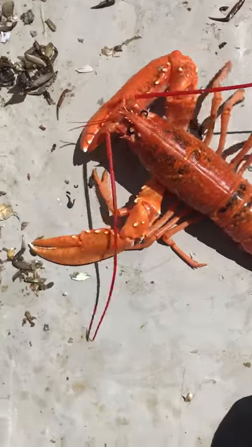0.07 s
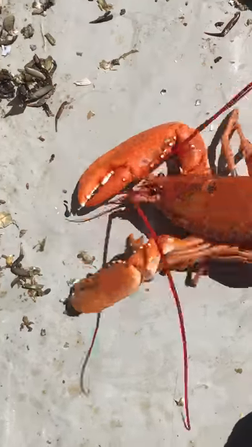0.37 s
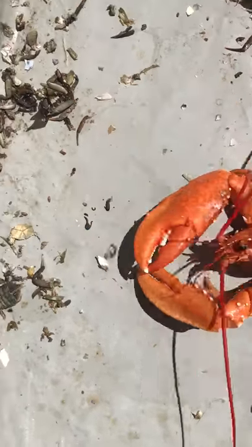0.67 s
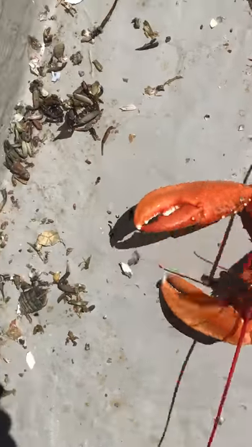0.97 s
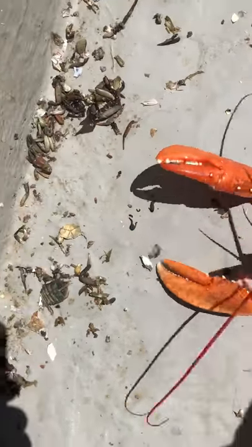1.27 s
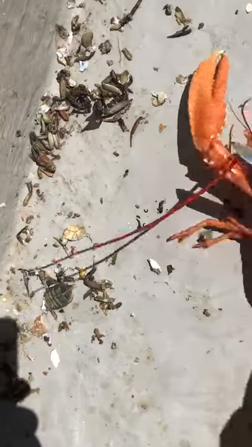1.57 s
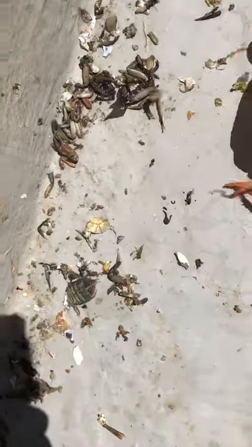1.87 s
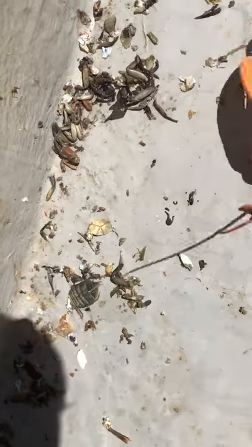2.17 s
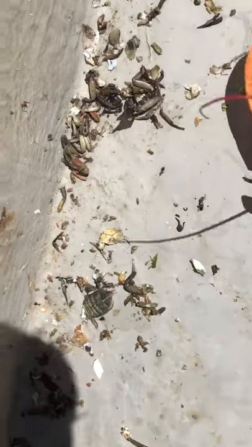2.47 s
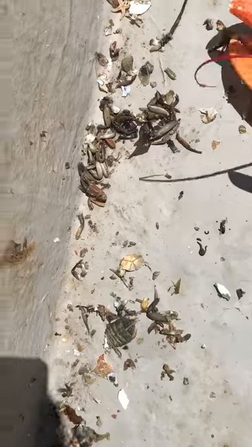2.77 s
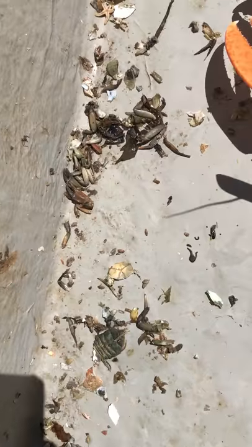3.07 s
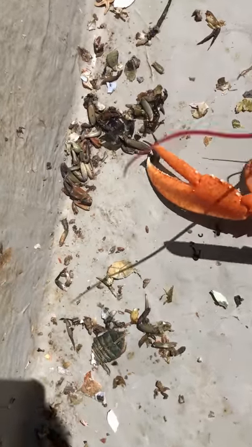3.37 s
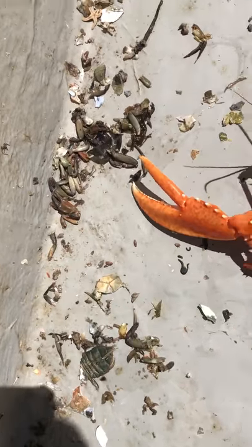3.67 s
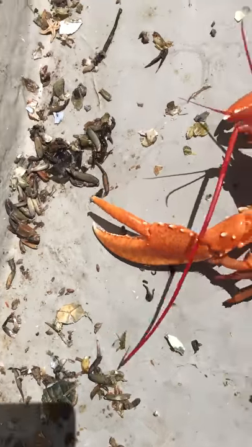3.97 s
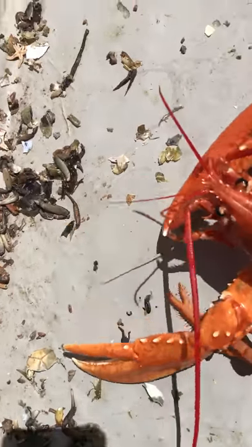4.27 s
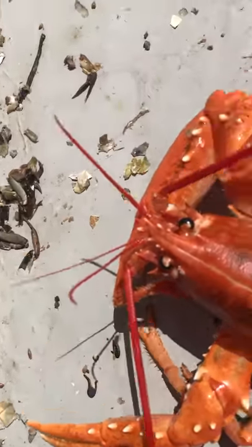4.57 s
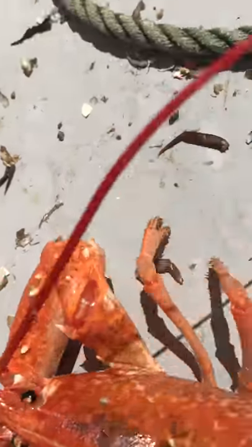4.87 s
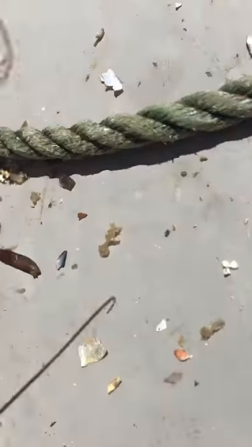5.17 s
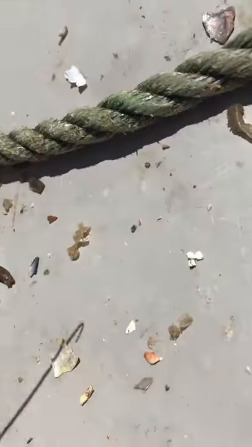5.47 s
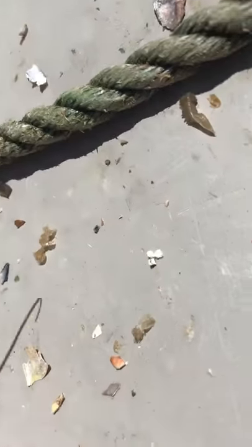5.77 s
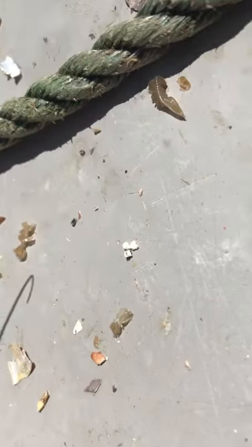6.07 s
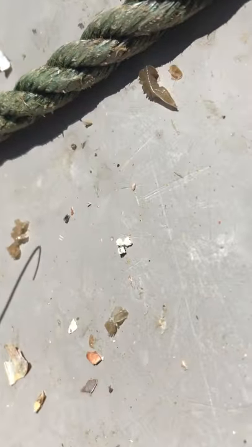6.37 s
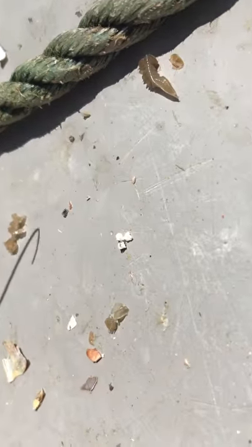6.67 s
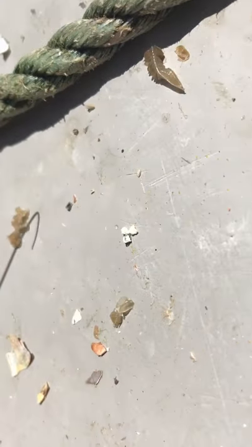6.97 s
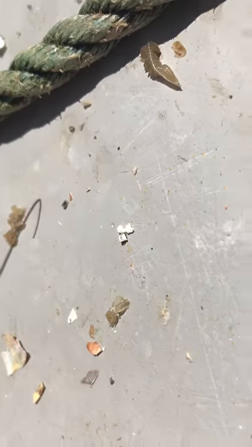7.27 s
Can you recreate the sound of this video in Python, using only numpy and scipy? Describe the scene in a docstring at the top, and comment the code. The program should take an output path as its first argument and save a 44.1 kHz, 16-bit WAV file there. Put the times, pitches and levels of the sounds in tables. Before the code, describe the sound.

Sharp shell slaps and thumps from a lobster on a deck give way to gritty crawling and dry snaps, over gulping water.

```python
"""A lobster flips its tail on a gritty boat deck, close to the microphone: the wet tail fan swishes, the
shell slaps, a hollow claw knocks and the body's weight thumps the deck's modes. It then crawls, grinding
its shell over sand with dull scuffs and small ticks of its legs. A thin squeak falls in three steps and
dry snaps follow. Water slops against the hull, gulping on trapped air, over a low outdoor rumble."""
import sys
import numpy as np
from scipy import signal
from scipy.fft import rfft, irfft, next_fast_len
from scipy.io import wavfile
from scipy.ndimage import uniform_filter1d, map_coordinates

SR = 44100
rng = np.random.default_rng(int(sys.argv[2]) if len(sys.argv) > 2 else 0)


def generate_wav(sig):
    """Save sig (samples, or channels by samples) to the path in sys.argv[1] as 16-bit PCM at SR."""
    pcm = np.round(np.clip(np.atleast_2d(sig).T, -1, 1) * 32767).astype(np.int16)
    wavfile.write(sys.argv[1], SR, pcm)


N = 322812

# swell of the hull's hollow murmur: (time [s], level [dB])
MURMUR_LEVELS = [(0.0, -53.5), (1.49, -35.5), (2.08, -47.5), (2.91, -37), (3.28, -43.5), (5.42, -46),
                 (5.71, -52.5), (6.24, -46.5), (7.32, -50)]
# tone of the hull murmur, the outdoor rumble and the ripples: (frequency [Hz], gain [dB])
MURMUR_EQ = [(60, -21), (110, -14.5), (165, 11), (205, 0), (245, 2), (330, -10), (500, -17.5), (1200, -69)]
RUMBLE_EQ = [(33, -50), (42, 0.5), (56, -0.5), (68, 2), (84, -5), (105, -0.5), (150, -13.5), (400, -65)]
LAPPING_EQ = [(150, -25), (380, 7), (650, -1.5), (1100, -8.5), (2000, -40.5), (6000, -37.5)]
# water slopping at the hull: (time [s], level [dB], start pitch [Hz], end pitch [Hz], t60 [s])
SLOPS = [(0.019, -28, 184, 151, 0.2), (0.804, -21.5, 129, 98, 0.14), (1.013, -26.5, 154, 100.4, 0.65),
         (1.293, -22, 176, 89, 0.3), (1.311, -17, 89, 57.6, 0.11), (1.367, -27, 147, 109, 0.13),
         (1.867, -25.5, 280, 200, 0.11), (2.927, -23.5, 148, 105, 0.47), (3.571, -24.5, 105, 66.5, 0.16),
         (4.328, -27, 227, 173, 0.13), (4.648, -23, 170, 146.4, 0.4), (4.674, -26, 88, 65, 0.11),
         (5.014, -28, 209, 197, 0.32), (5.321, -20, 241, 195, 0.35), (5.328, -24.5, 140, 99.7, 0.47),
         (6.0669, -32.5, 1570, 930, 0.16), (6.122, -14.5, 112, 50.4, 0.27), (6.23, -24.5, 87.5, 60.6, 0.61),
         (6.915, -20.5, 115, 95, 0.17), (7.154, -28, 194.6, 128.5, 0.43), (7.18, -25, 83, 60.5, 0.15)]
# steps of the squeak: (time [s], length [s], pitch [Hz], level [dB])
SQUEAK_STEPS = [(4.395, 0.087, 6290, -52.5), (4.489, 0.11, 5620, -48.5), (4.598, 0.14, 4880, -45)]
# its partials: (frequency [x pitch], level [dB])
SQUEAK_PARTIALS = [(0.69, -18), (1, -.5), (2, -19)]
# thin, dry snaps: (time [s], peak [dB])
SNAPS = [(5.519, -35), (5.584, -31), (5.65, -27.5), (5.771, -26.5), (5.776, -24), (6.091, -33),
         (6.1254, -24.5), (6.162, -27.5), (6.1915, -10.5), (6.195, -13.5), (6.222, -16), (6.266, -24),
         (6.401, -29.5), (6.4356, -11.5), (6.53, -25.5), (6.79, -26), (6.948, -30), (7.2346, -33.5)]
# resonances of every snap: (frequency [Hz], gain [dB])
SNAP_EQ = [(300, -6), (1500, -1), (2500, -11.5), (4100, 5.5), (5500, -10.5), (6760, 6.5), (7700, -28),
           (8700, 0), (10400, -14), (11800, 2.5), (13000, -9.5), (16000, -6)]
# the shell dragging: (time [s], grind level [dB], hiss level [dB])
DRAG_LEVELS = [(0.0, -43, -44), (0.24, -52.5, -66), (0.49, -38.5, -43.5), (0.61, -44, -42),
               (0.83, -45.5, -48), (1.32, -45.5, -45), (1.49, -34, -40), (1.67, -45.5, -45),
               (2.14, -53, -49), (2.42, -41.5, -44), (2.59, -60, -56), (2.75, -41.5, -45),
               (2.89, -47.5, -39.5), (3.12, -44, -40.5), (3.3, -50.5, -50), (3.69, -50, -52),
               (4.03, -45, -49.5), (4.36, -45.5, -51.5), (4.69, -47, -53.5), (5.12, -50.5, -53.5),
               (5.42, -56.5, -61), (6.54, -52, -53), (6.99, -54.5, -57), (7.32, -56.5, -56)]
# tone of its grind and hiss: (frequency [Hz], gain [dB])
GRIND_EQ = [(180, -18.5), (330, 8.5), (480, -6.5), (620, -3), (790, -1), (1000, 0), (1600, -2.5),
            (2400, -11.5), (4000, -19.5), (8000, -57.5)]
HISS_EQ = [(1200, 3.5), (2400, 5.5), (3600, 6.5), (6000, 2.5), (9000, -0.5), (10500, -5.5), (12200, 0),
           (16000, -8)]
# the drag ducks as the animal holds still: (centre time [s], gain [dB])
PAUSES = [(.68, -5.5), (1.01, -9), (1.39, -12), (2.21, -1), (2.66, -4), (4.09, -8), (4.785, -5.5),
          (6.331, -4.5)]
# dull, hollow scuffs: (peak time [s], half-length [s], level [dB], centre frequency [Hz])
SCUFFS = [(.43, 0.054, -30, 219), (1.311, 0.025, -35.5, 297), (2.325, 0.03, -31, 270),
          (4.311, 0.16, -40.5, 550), (4.675, .035, -42, 326), (4.95, 0.031, -42, 430),
          (6.135, 0.039, -39, 600), (6.792, 0.027, -39.5, 282), (7.154, 0.078, -45.5, 560)]
# leg tips tapping: (time [s], peak [dB], ring pitch [Hz])
TICKS = [(0.4646, -24, 2460), (0.495, -26, 2520), (0.697, -24, 12500), (1.749, -27.5, 9350),
         (1.783, -29, 3450), (2.772, -18.5, 3460), (3.574, -30, 2820), (3.752, -27, 5530),
         (4.2915, -22.5, 3440), (4.327, -31, 2480), (4.3852, -39, 2600), (4.9342, -27, 5930),
         (6.6522, -19, 2910), (6.8095, -29, 2600)]
# a tick's ring: (frequency [x ring pitch], level [dB])
TICK_PARTIALS = [(1, -4), (1.46, -10)]
# a tick's click: (frequency [Hz], gain [dB])
CLICK_EQ = [(200, -11), (600, -1.5), (1500, 3), (2300, 2.5), (4200, 2), (6600, 1), (8200, -9.5),
            (14000, -8)]
# the claw knocking: (time [s], peak [dB], tuning [x mode frequency], tilt [dB/octave])
KNOCKS = [(.364, -36, 0.93, -2), (0.418, -21.5, 0.74, -1), (.449, -29, 0.62, -1), (.465, -25.5, 0.73, -10),
          (0.495, -28, 0.8, 5), (.531, -24, 0.92, -12), (.748, -23, 0.95, -20), (0.7913, -20.5, 1.4, -16),
          (1.126, -17, 1.28, 11), (1.412, -33, 0.93, -3), (1.5395, -17, 1, -10), (1.9536, -17, 0.89, 14),
          (2.301, -19.5, 0.76, 10), (2.333, -21.5, 0.97, 0), (2.3578, -20.5, 0.96, 0),
          (3.235, -27, 0.85, 2), (4.075, -32, 1.3, -2), (4.122, -32.5, 1.28, 3), (4.29, -23.5, 0.98, 6),
          (4.328, -24, 1.25, 10), (4.413, -24, 0.87, -10), (6.193, -24.5, 0.63, -5),
          (6.435, -21, 0.617, 8.5), (6.63, -29, 0.5, -5)]
# modes of the claw and of the deck: (frequency [Hz], level [dB], t60 [s])
CLAW_MODES = [(838, -4, 0.043), (957, -1, 0.071), (1232, -2, 0.052), (1650, -11, 0.045), (1900, -3, .035),
              (2400, -10, 0.014)]
DECK_MODES = [(104, -15.5, 0.25), (169.6, -2.5, 0.15), (226.6, -0.5, 0.078), (242, 8.5, 0.027),
              (297, -5, 0.12), (366, -8.5, 0.063), (777, 0.5, 0.043), (1116, -8.5, 0.075)]
# the body landing: (time [s], peak [dB], contact time [s])
THUMPS = [(0.363, -19.5, 0.00049), (0.403, -17, 0.0023), (.414, -14, 0.00034), (.448, -18, 0.00035),
          (0.47, -22, 0.00046), (0.558, -13, 0.017), (0.564, -16, 0.006), (0.723, -21.5, 0.00026),
          (0.79, -17, 0.0091), (1.083, -22, .002), (1.128, -14.5, 0.014), (1.305, -27, 0.0036),
          (1.33, -23, .012), (1.484, -17.5, 0.002), (1.539, -11.5, 0.00069), (1.623, -23, 0.0023),
          (1.915, -2.5, 0.0025), (2.298, -20.5, 0.00072), (2.3236, -8.5, 0.0051), (2.702, -18, 0.00065),
          (2.751, -18.5, 0.0022), (2.812, -20.5, 0.013), (2.926, -17, 0.027), (3.546, -24, 0.003),
          (5.121, -23, 0.0011), (6.486, -23, 0.00037)]
# tail and claws sweeping over grit: (peak time [s], length [s], mid level [dB], brightness [dB/band])
SWISHES = [(.055, 0.05, -56, -5), (0.295, 0.25, -51, -2.5), (0.379, 0.076, -42, -5.5),
           (0.425, 0.051, -32.5, 4.5), (0.602, 0.1, -43, 3), (0.776, 0.049, -37.5, 7),
           (0.947, 0.047, -41.5, 1.5), (1.106, 0.074, -36, -1), (1.467, 0.026, -34, 2.5),
           (1.494, 0.061, -33.5, 5), (2.113, 0.066, -54, 6.5), (2.291, 0.035, -34, -0.5),
           (2.539, 0.13, -45, -1), (2.752, 0.09, -43, -0.5), (2.862, 0.029, -27, 9),
           (3.314, 0.046, -42.5, -3), (3.476, 0.083, -53, 0.5), (3.962, 0.039, -51, -4.5),
           (4.298, 0.098, -50, -12), (4.846, 0.05, -48.5, -8.5), (4.899, 0.07, -48, -8),
           (6.072, 0.018, -58, -22), (6.452, 0.071, -58, -18)]
# shell hitting the deck: (time [s], level [dB], brightness [dB/band], ring pitch [Hz], mid t60 [s])
SLAPS = [(0.424, -22, 1.5, 12750, 0.0059), (.448, -24.5, 4.5, 9500, 0.0051), (.531, -34, 5.5, 850, 0.016),
         (0.5645, -27.5, -1, 884, 0.02), (0.5705, -26, -1, 1630, 0.023), (0.7463, -24, -2.5, 3430, 0.028),
         (0.784, -31, -1, 2830, 0.02), (0.7881, -22, 6, 5700, 0.03), (0.7927, -21.5, 0.5, 1300, 0.03),
         (1.0821, -25, 0, 3520, 0.028), (1.1261, -16, 4.5, 4200, 0.029), (1.452, -24.5, -3.5, 1900, 0.074),
         (1.538, -36, -12.5, 1440, 0.019), (1.569, -26.5, 20, 9400, 0.0088), (1.574, -37, 5, 9350, 0.076),
         (1.9074, -23, 9, 6040, 0.041), (1.913, -29, -3.5, 8300, 0.07), (1.953, -25, -3, 1890, 0.011),
         (2.312, -24, -2.5, 11700, 0.053), (2.3155, -19.5, 3, 3370, 0.021), (2.357, -27.5, -6, 1870, 0.015),
         (2.6981, -38.5, -7.5, 1510, 0.04), (2.739, -18.5, 1, 4830, 0.02), (2.7489, -21, 0, 5130, 0.036),
         (2.758, -30, 7, 5200, 0.018), (2.839, -31.5, 4, 7500, 0.12), (2.904, -33, 6, 6560, 0.069),
         (2.926, -16.5, 1, 1890, 0.011), (3.2801, -32, -4.5, 920, 0.035), (3.5447, -39.5, -6.5, 980, 0.063),
         (4.2895, -39, -12, 3600, 0.03), (4.387, -47.5, -19.5, 587, 0.023),
         (5.321, -42.5, -2.5, 1150, 0.072), (6.91, -43, -7.5, 560, 0.047)]
# edges of the shell's low, mid and high bands: (frequency [Hz])
BAND_EDGES = [400, 2800, 7500, 20000]
BAND_TILT = np.array([-1, 0, 1])  # brightness trades lows for highs


def amp(db):
    """Decibels to gain."""
    return 10 ** (np.asarray(db) / 20)


def unit(x):
    """Scale to rms 1."""
    return x / np.sqrt(np.mean(x ** 2) + 1e-20)


def at_peak(x, db):
    """Scale to a peak level."""
    return amp(db) * x / np.abs(x).max()


def curves(rows):
    """One automation curve for each column after the time."""
    times, *columns = np.transpose(rows)
    return [np.interp(np.arange(N) / SR, times, column) for column in columns]


def wobble(rate):
    """A smooth random curve, rate knots a second."""
    return map_coordinates(rng.standard_normal(int(N * rate / SR) + 4), [np.arange(N) * rate / SR])


def filtered(x, response):
    """Filter x by a gain given as a function of frequency."""
    padded = next_fast_len(len(x) + 8192)
    return irfft(rfft(x, padded) * response(np.fft.rfftfreq(padded, 1 / SR)), padded)[:len(x)]


def coloured(x, eq):
    """x through an EQ curve, at rms 1."""
    points_hz, db = np.transpose(eq)
    return unit(filtered(x, lambda hz: amp(np.interp(np.log(hz + 1), np.log(points_hz), db))))


def add(track, s, sound):
    """Mix a sound into the track at time s."""
    part = track[max(round(s * SR), 0):][:len(sound)]
    part += sound[:len(part)]


def patchy(x, depth_db, bins, frames):
    """Shifting contact lights up passing resonances, random patches in frequency and time."""
    spectrogram = signal.stft(x, nperseg=512)[2]
    patches = uniform_filter1d(rng.standard_normal(spectrogram.shape), bins, 0)
    patches = uniform_filter1d(patches, frames, 1)
    return signal.istft(spectrogram * amp(depth_db * unit(patches)), nperseg=512)[1][:len(x)]


def hull_wash():
    """The bed: water and wind keep the hull rumbling, and ripples lap faintly along it."""
    murmur_db, = curves(MURMUR_LEVELS)
    murmur = amp(murmur_db + 0.5 + wobble(6.3)) * coloured(rng.standard_normal(N), MURMUR_EQ)
    rumble = amp(-40.5 + wobble(4)) * coloured(rng.standard_normal(N), RUMBLE_EQ)
    lapping_db = -56.5 + 3 * wobble(18)
    ripples = patchy(rng.standard_normal(N), depth_db=3.5, bins=2, frames=6)
    return murmur + rumble + amp(lapping_db) * coloured(ripples, LAPPING_EQ)


def gulp(start_hz, end_hz, t60, fall_s=0.032, rise_cycles=1.7):
    """Trapped air gulps with a falling, wavering pitch; the larger the pocket, the deeper its churn."""
    t = np.arange(SR // 2) / SR
    glide_hz = end_hz + (start_hz - end_hz) * np.exp(-t / fall_s)
    hz = glide_hz * (1 + .07 * wobble(70)[:len(t)])
    churn_eq = [(start_hz * ratio, db)
                for ratio, db in [(.25, -40), (.6, -1), (1.3, 0), (3, -19), (10, -35), (30, -60)]]
    churn = coloured(rng.standard_normal(len(t)), churn_eq) * (.28 + .17 * np.exp(-t / .04))
    rise_s = rise_cycles / start_hz
    envelope = np.minimum(t / rise_s, 1) * amp(-60 * np.maximum(t - rise_s, 0) / t60)
    return envelope * (np.sin(2 * np.pi * np.cumsum(hz) / SR) + churn)


def water_slops():
    """Water gulps against the hull."""
    out = np.zeros(N)
    for s, db, start_hz, end_hz, t60 in SLOPS:
        add(out, s, amp(db) * gulp(start_hz, end_hz, t60))
    return out


def squeak(sag_hz=270, rasp_s=0.009, attack_s=0.006, release_s=0.013):
    """A thin, unsteady whistle: each step breaks in with a rasp, then sags in pitch."""
    out, t = np.zeros(N), np.arange(size := SR // 3) / SR
    for s, length, hz, db in SQUEAK_STEPS:
        rasp = (.009 + .06 * np.exp(-t / rasp_s)) * wobble(1500)[:size]
        drift = .004 * wobble(40)[:size]
        pitch = (hz - sag_hz * np.minimum(t / length, 1.2) ** 2) * (1 + rasp + drift)
        phase = 2 * np.pi * np.cumsum(pitch) / SR
        tone = sum(amp(partial_db + 3 * wobble(50)[:size]) * np.sin(ratio * phase)
                   for ratio, partial_db in SQUEAK_PARTIALS)
        envelope = np.minimum(t / attack_s, 1) * np.exp(-np.maximum(t - length, 0) / release_s)
        add(out, s, amp(db) * envelope * tone)
    return out


def snaps(crack_t60=0.011, tail_t60=0.082):
    """Something small and stiff clicks close by, always with the same high resonances."""
    out, t = np.zeros(N), np.arange(size := 2048) / SR
    envelope = amp(-60 * t / crack_t60) + amp(-18 - 60 * t / tail_t60)
    for s, db in SNAPS:
        add(out, s, at_peak(coloured(rng.standard_normal(size), SNAP_EQ) * envelope, db))
    return out


def grit(size, rate, smooth):
    """Tiny fractures of unequal size, rate a second, over a smooth rub."""
    strengths = amp(4 * np.minimum(rng.exponential(size=size), 3))
    cracks = (rng.random(size) < rate / SR) * rng.choice([-1, 1], size) * strengths
    return unit(unit(cracks) + smooth * rng.standard_normal(size))


def pause_dips_db(half_length_s=0.066):
    """The rubbing ducks and returns abruptly at each pause."""
    s, dip_db = np.transpose(PAUSES)[:, :, None]
    return (dip_db * np.exp(-((np.arange(N) / SR - s) / half_length_s) ** 4)).sum(0)


def shell_drag():
    """Shell and legs grind over sand in uneven little pushes; the hiss comes in soft, broad patches."""
    grind_db, hiss_db = curves(DRAG_LEVELS)
    push_db = 1.6 * wobble(28) + wobble(120)
    coarse = patchy(grit(N, rate=700, smooth=1.3), depth_db=4.5, bins=2, frames=6)
    fine = patchy(grit(N, rate=260, smooth=2.4), depth_db=3.4, bins=3, frames=7)
    grind = amp(grind_db + 1.5) * coloured(coarse, GRIND_EQ)
    hiss = amp(hiss_db) * coloured(fine, HISS_EQ)
    return amp(push_db + pause_dips_db()) * (grind + hiss)


def deck_scuffs(half_width_octaves=0.54):
    """A soft, heavy rub swells and fades in one broad resonance of the deck."""
    out, t = np.zeros(N), np.arange(SR // 2) / SR
    middle = t[-1] / 2
    for s, half_length, db, centre_hz in SCUFFS:
        rub = filtered(rng.standard_normal(len(t)),
                       lambda hz: np.exp(-(np.log2((hz + 1) / centre_hz) / half_width_octaves) ** 2 / 2))
        swell = np.exp(-((t - middle) / half_length) ** 2)
        add(out, s - middle, amp(db) * unit(rub) * swell)
    return out


def leg_ticks(t60=0.027):
    """A hard leg tip gives a click and a very short ring."""
    out, t = np.zeros(N), np.arange(size := 2048) / SR
    for s, db, ring_hz in TICKS:
        ring = sum(amp(partial_db) * np.sin(2 * np.pi * ratio * ring_hz * t)
                   for ratio, partial_db in TICK_PARTIALS)
        click = .5 * coloured(rng.standard_normal(size), CLICK_EQ)
        add(out, s, at_peak((click + ring) * amp(-60 * t / t60), db))
    return out


def claw_knocks(attack_s=0.00038):
    """The hollow claw rings a little differently at each spot; harder contact favours upper modes."""
    out, t = np.zeros(N), np.arange(4096) / SR
    hz, mode_db, t60 = np.transpose(CLAW_MODES)[:, :, None]
    for s, db, tuning, tilt_db in KNOCKS:
        strength, detune, phase = rng.standard_normal((3, len(CLAW_MODES), 1))
        level_db = mode_db + tilt_db * np.log2(hz / hz[0]) + 3.4 * strength - 60 * t / t60
        modes = amp(level_db) * np.sin(2 * np.pi * (hz * tuning * (1 + 0.021 * detune) * t + phase))
        add(out, s, at_peak(modes.sum(0) * (1 - np.exp(-t / attack_s)), db))
    return out


def body_thumps(attack_s=0.0021):
    """The body's weight rings the deck; a longer contact softens the higher modes."""
    out, t = np.zeros(N), np.arange(SR // 2) / SR
    hz, mode_db, t60 = np.transpose(DECK_MODES)[:, :, None]
    for s, db, contact_s in THUMPS:
        strength, detune = rng.standard_normal((2, len(DECK_MODES), 1))
        envelopes = amp(mode_db + 2 * strength - 60 * t / t60) / (1 + (hz * contact_s) ** 2)
        modes = envelopes * np.sin(2 * np.pi * hz * (1 + 0.03 * detune) * t)
        add(out, s, at_peak(modes.sum(0) * (1 - np.exp(-t / attack_s)), db))
    return out


def shell_bands(x, ripple_db, ring_hz=1, ring_db=0):
    """Lows, mids and highs of a contact: an optional main shell ring and many small, random ones."""
    hz = np.fft.rfftfreq(len(x), 1 / SR) + 1
    ripple = map_coordinates(rng.standard_normal(128), [np.sqrt(hz) / 2.4], mode="nearest")
    resonance_db = ring_db / (1 + ((hz - ring_hz) / (.14 * ring_hz)) ** 2)
    spectrum = rfft(x) * amp(ripple_db * ripple + resonance_db) / hz ** 0.26
    bands = [spectrum / np.sqrt((1 + (low / hz) ** 8) * (1 + (hz / high) ** 8))
             for low, high in zip(BAND_EDGES, BAND_EDGES[1:])]
    return np.array([unit(irfft(band, len(x))) for band in bands])


def tail_swishes(rise_share=0.42):
    """The wet tail fan swishes over the grit, swelling and dying."""
    out, t = np.zeros(N), np.arange(size := 16384) / SR
    middle = t[-1] / 2
    for s, length, db, bright_db in SWISHES:
        bands = shell_bands(grit(size, rate=1200, smooth=1.2), ripple_db=2.6)
        rub = amp(db + bright_db * BAND_TILT) @ bands
        fade_s = length * np.where(t < middle, rise_share, 1 - rise_share)
        stroke = np.exp(-np.abs((t - middle) / fade_s) ** 1.86)
        add(out, s - middle, rub * stroke)
    return out


def shell_slaps(ring_lift_db=4, attack_s=0.00017):
    """Each slap is a crack whose treble dies first; the deck and its walls answer faintly."""
    out, t = np.zeros(N), np.arange(size := 8192) / SR
    answer = amp([[-16], [-21], [-25]]) * amp(-60 * t / np.array([[.15], [.11], [.08]]))  # low, mid, high
    for s, db, bright_db, ring_hz, t60 in SLAPS:
        holds_ring = np.diff(np.greater(BAND_EDGES, ring_hz))
        band_db = db + bright_db * BAND_TILT + ring_lift_db * holds_ring
        bands = shell_bands(grit(size, rate=6000, smooth=.8), ripple_db=4, ring_hz=ring_hz, ring_db=6)
        hit = amp(-60 * t / (t60 * np.array([[1.2], [1], [.9]])))
        crack = (amp(band_db)[:, None] * bands * np.hypot(hit, answer)).sum(0)
        add(out, s, crack * (1 - np.exp(-t / attack_s)))
    return out


def scene():
    """The lobster up front and the water behind it, in mono."""
    contacts = shell_slaps() + claw_knocks() + tail_swishes() + deck_scuffs() + leg_ticks()
    return (contacts + snaps() + body_thumps() + water_slops() + shell_drag() + squeak() + hull_wash())[None]


def record(dry):
    """The microphone sheds the deepest bass, peaks clip at full scale and the very top is cut."""
    low_cut = signal.butter(2, 35, "high", fs=SR, output="sos")
    clipped = np.clip(signal.sosfilt(low_cut, dry[0]), -1, 1)
    return filtered(clipped, lambda hz: hz < 15900)[None]


dry = scene()
out = record(dry)
generate_wav(out)
```